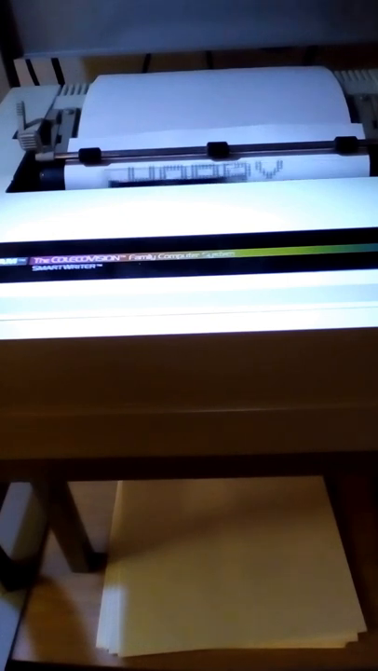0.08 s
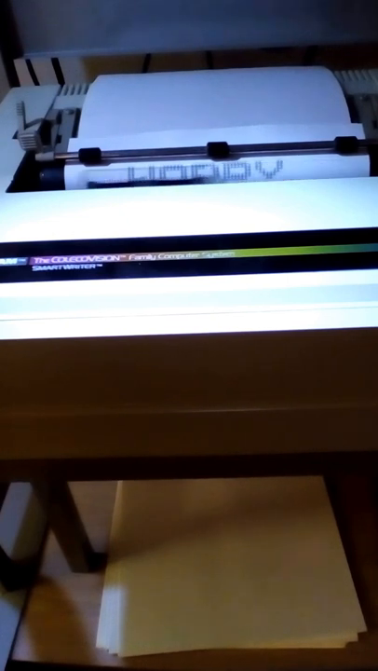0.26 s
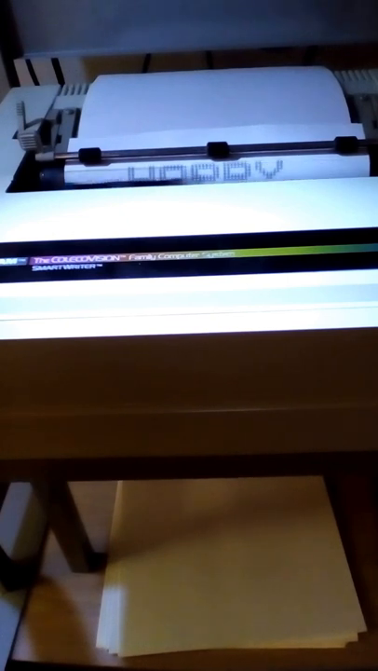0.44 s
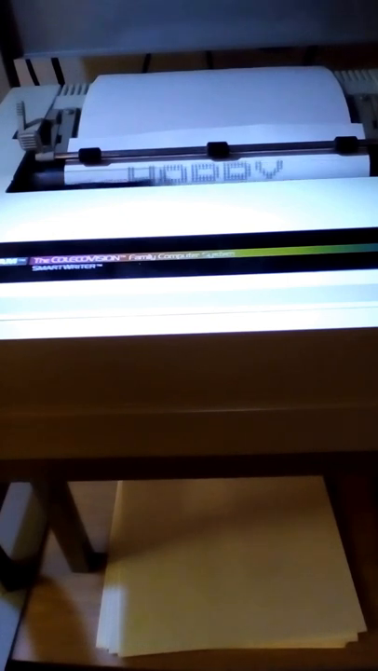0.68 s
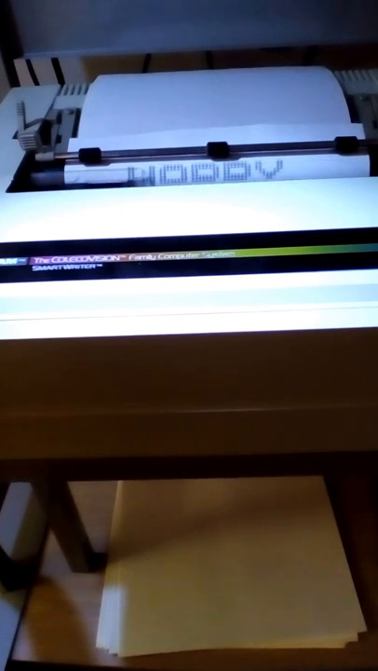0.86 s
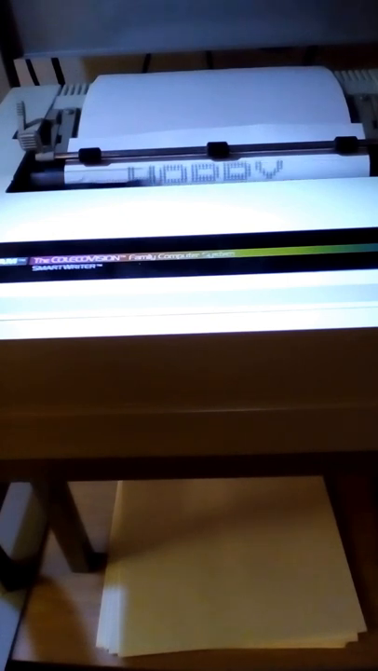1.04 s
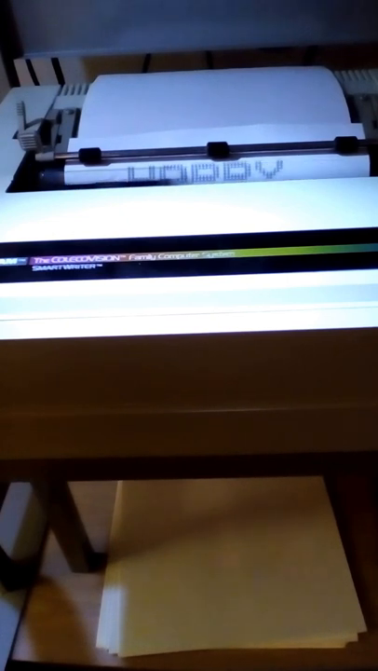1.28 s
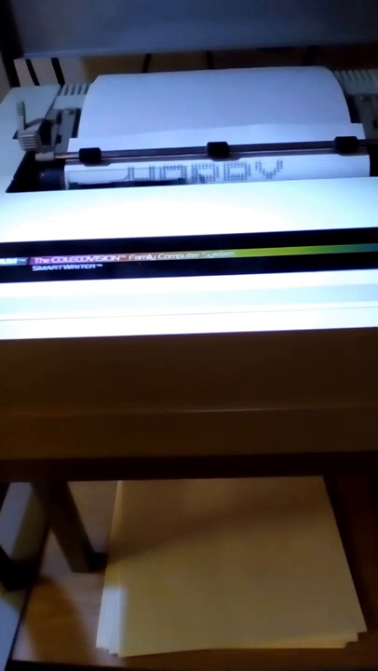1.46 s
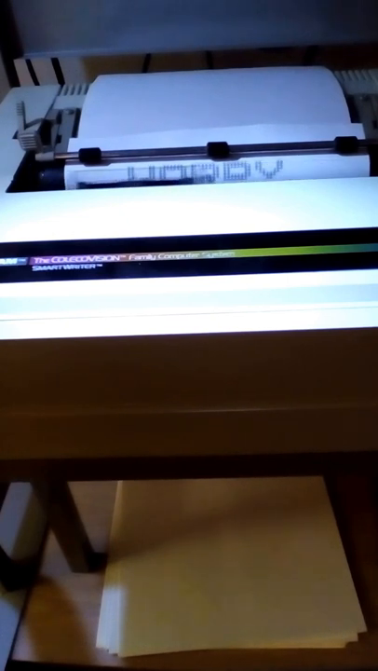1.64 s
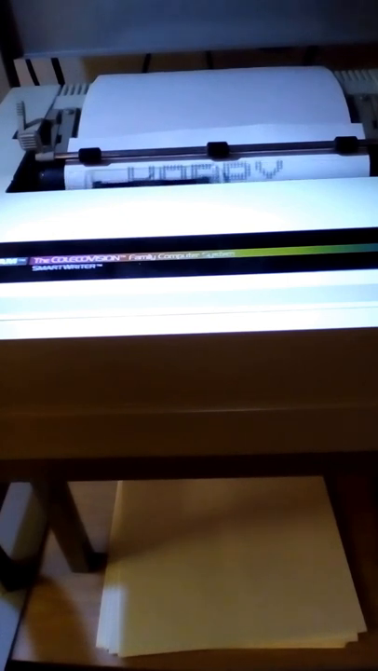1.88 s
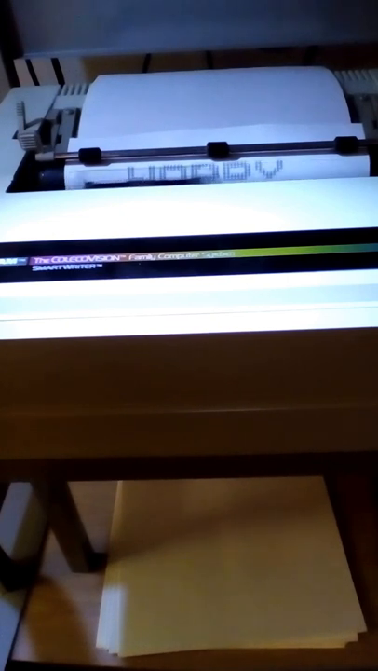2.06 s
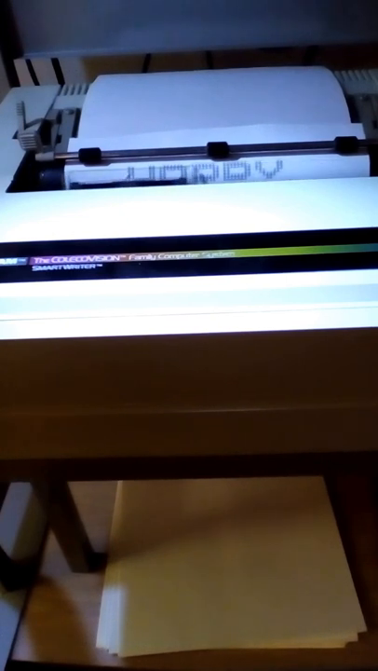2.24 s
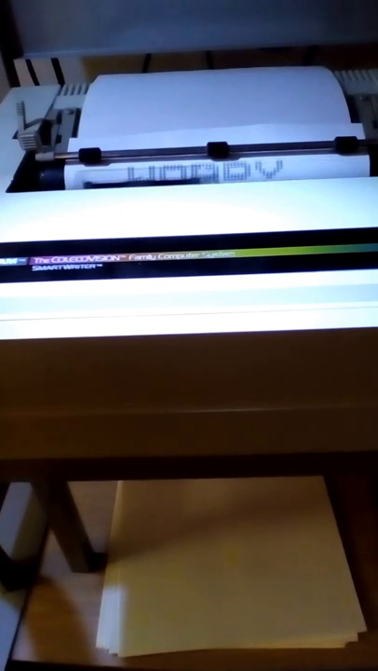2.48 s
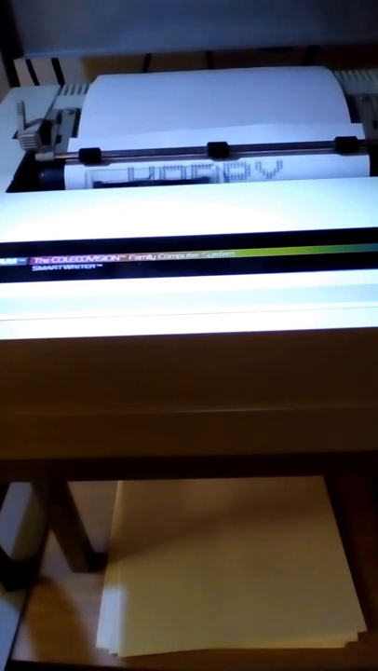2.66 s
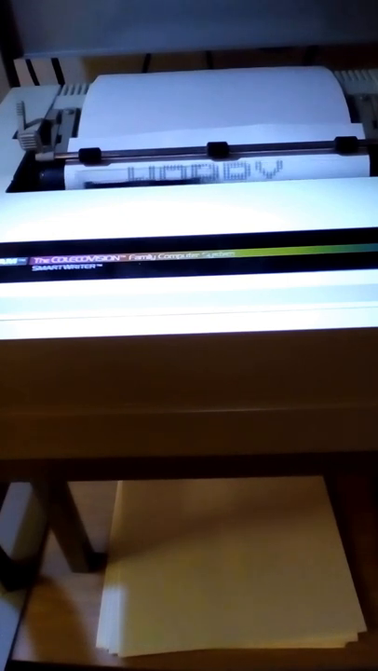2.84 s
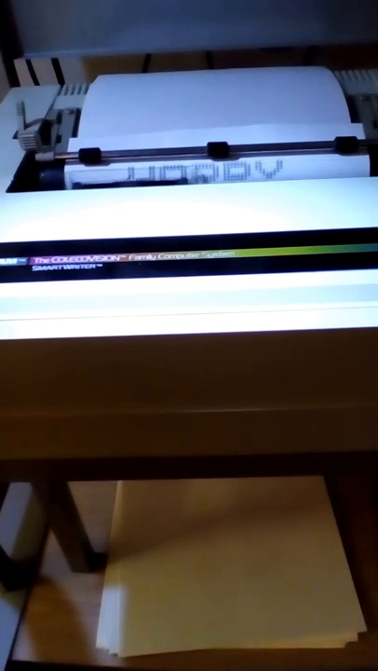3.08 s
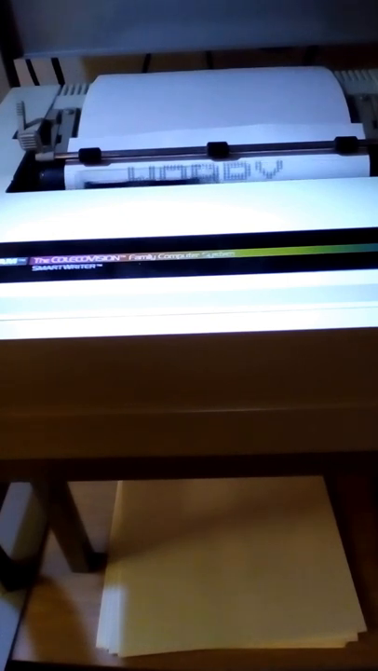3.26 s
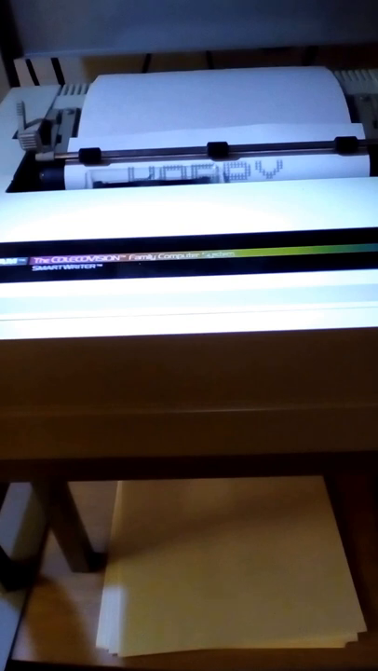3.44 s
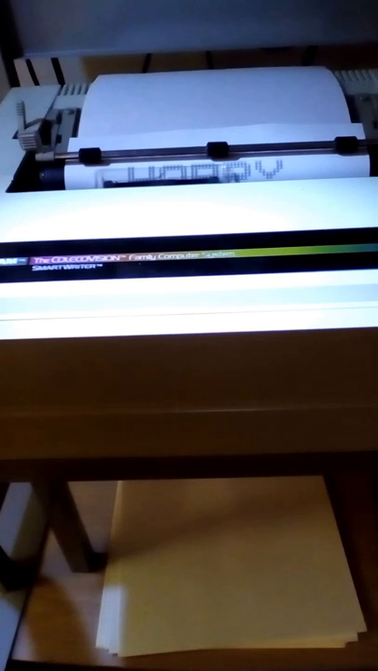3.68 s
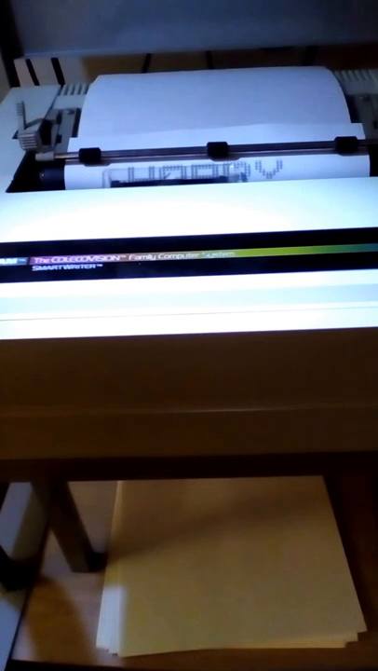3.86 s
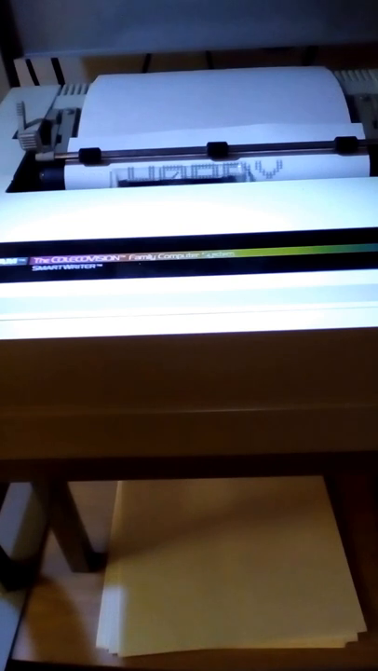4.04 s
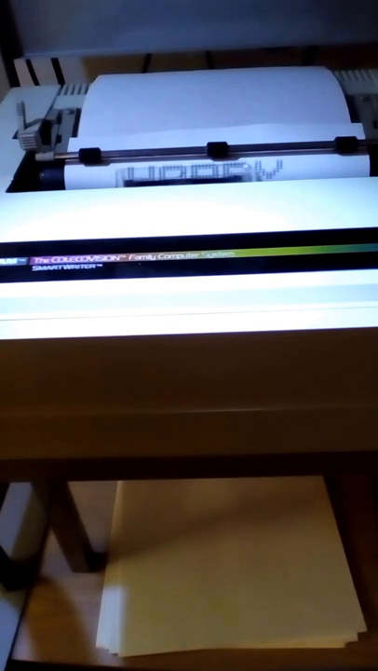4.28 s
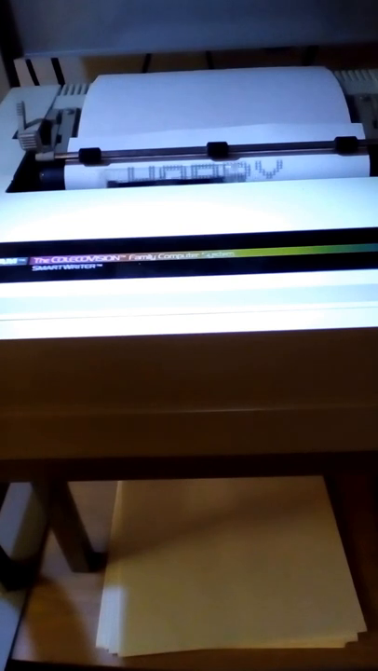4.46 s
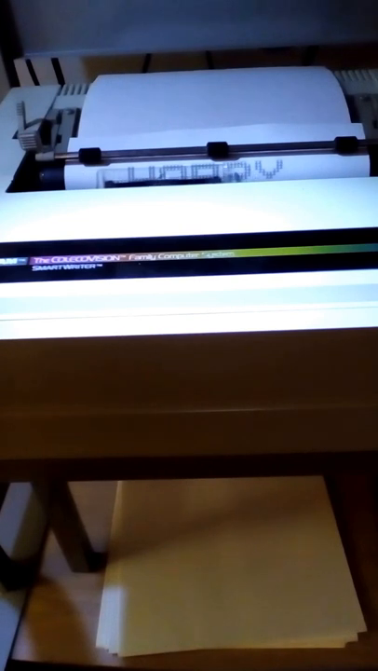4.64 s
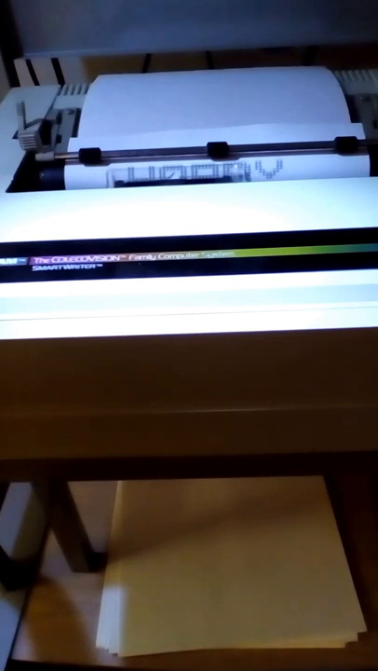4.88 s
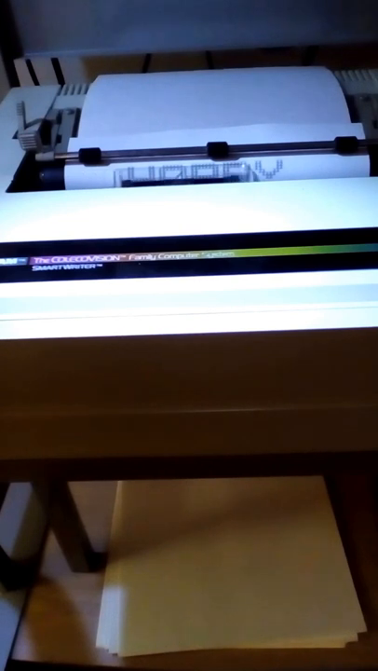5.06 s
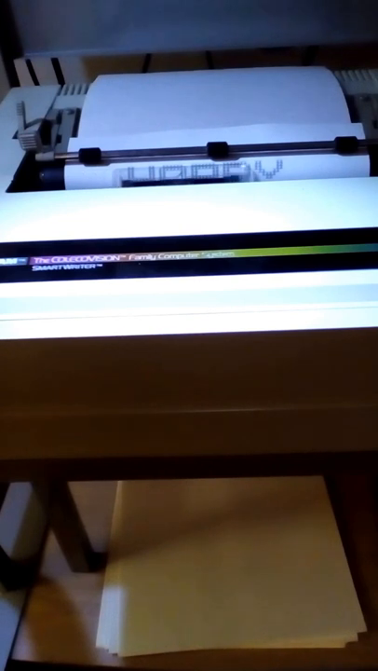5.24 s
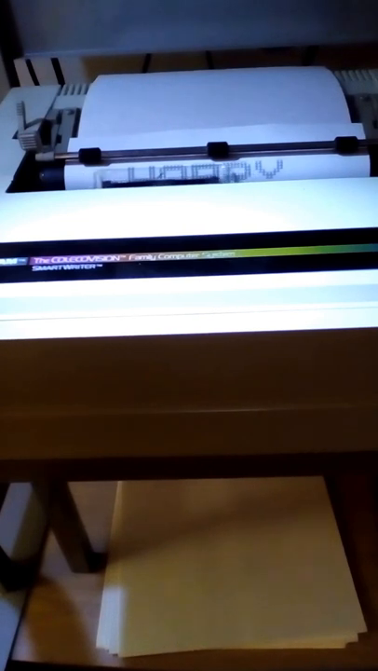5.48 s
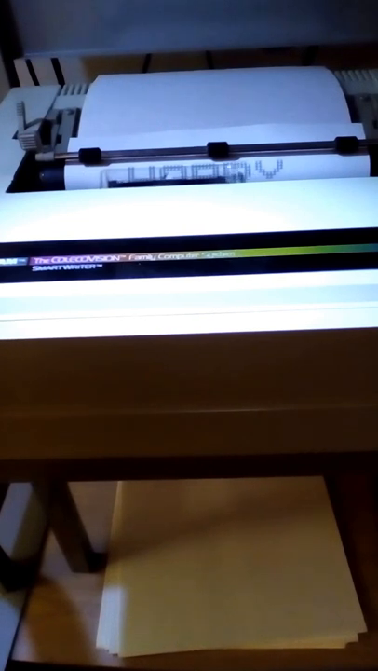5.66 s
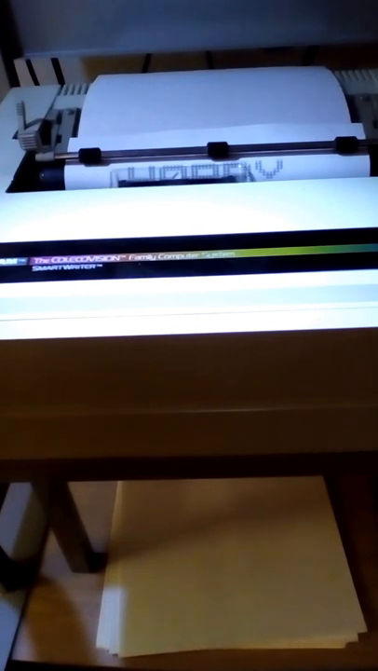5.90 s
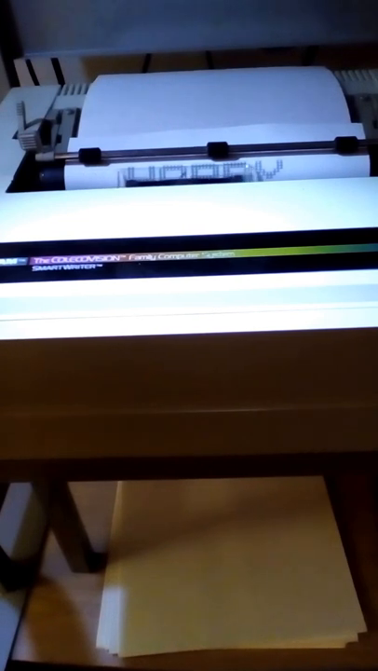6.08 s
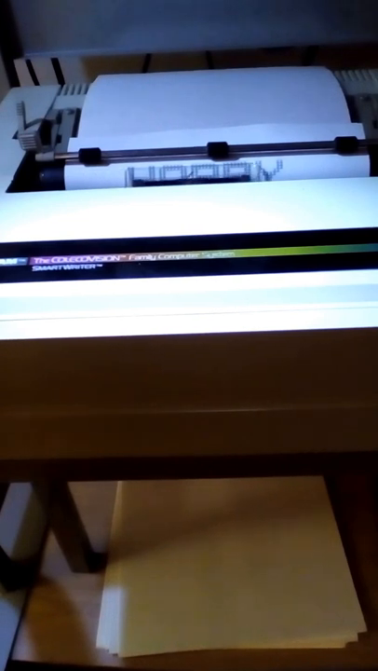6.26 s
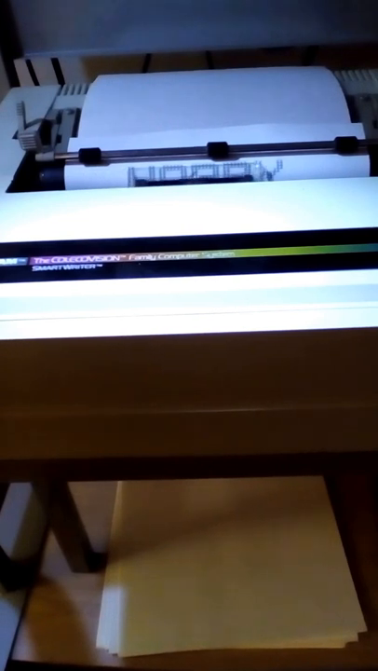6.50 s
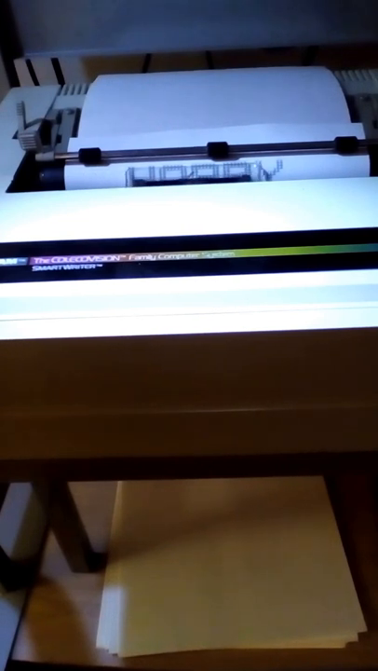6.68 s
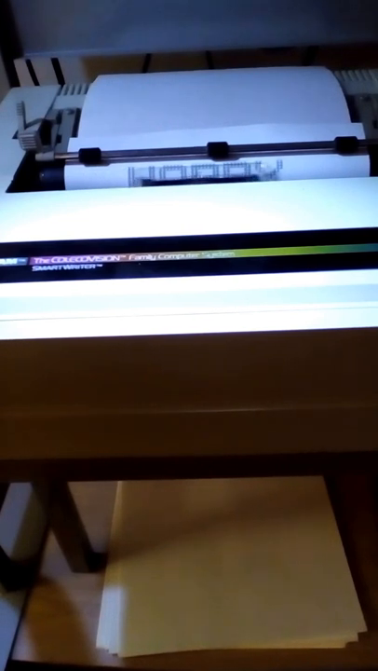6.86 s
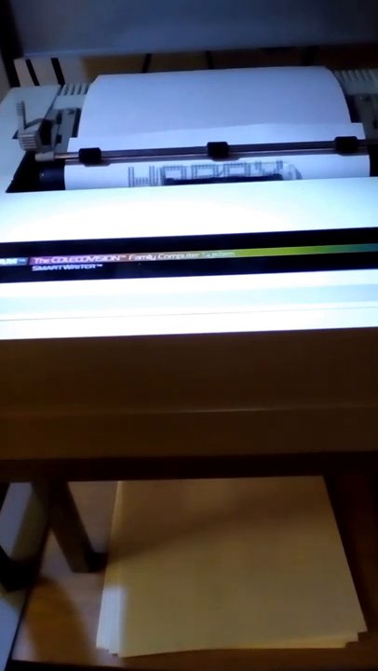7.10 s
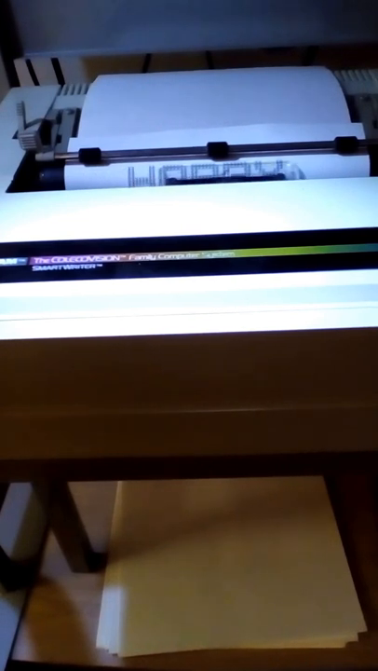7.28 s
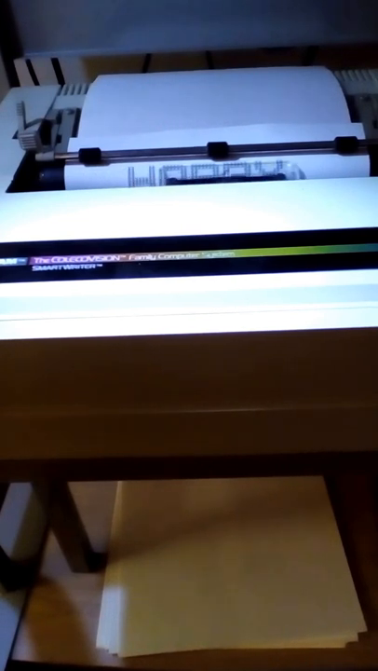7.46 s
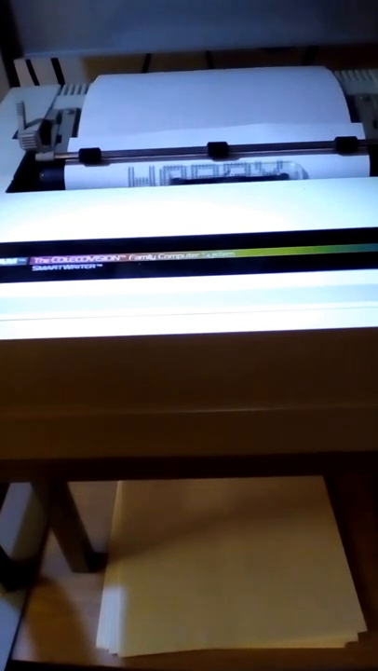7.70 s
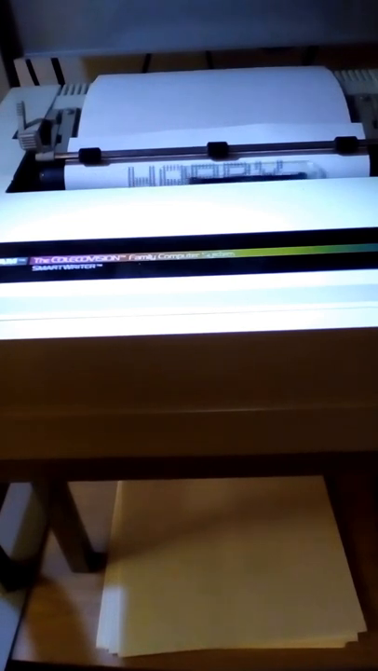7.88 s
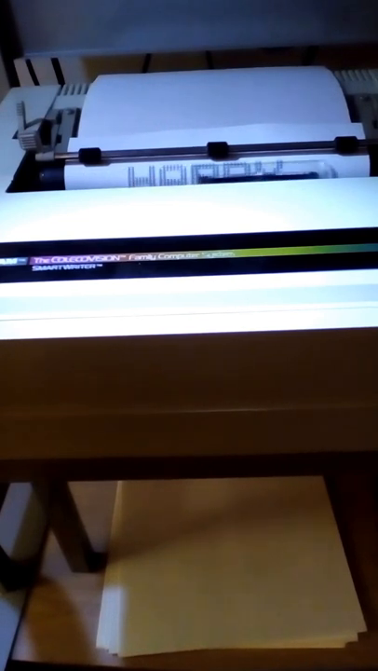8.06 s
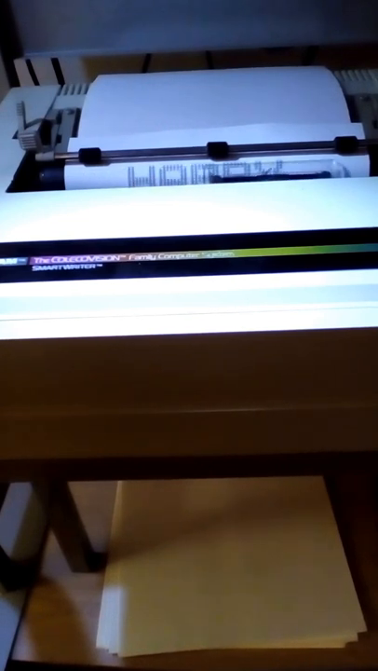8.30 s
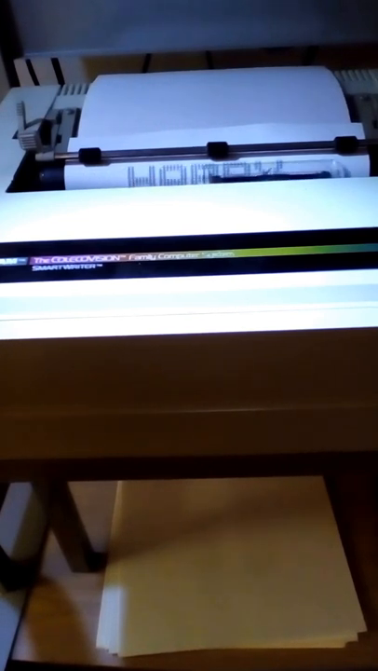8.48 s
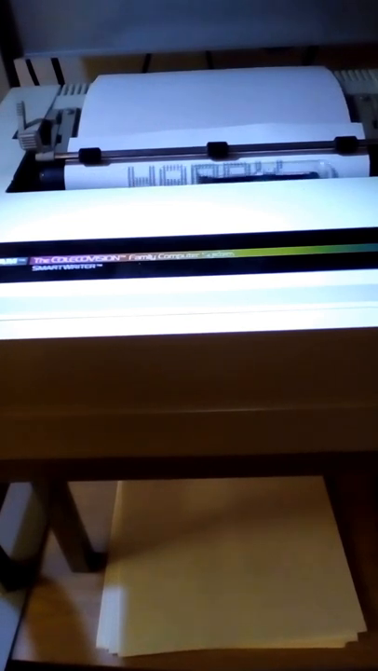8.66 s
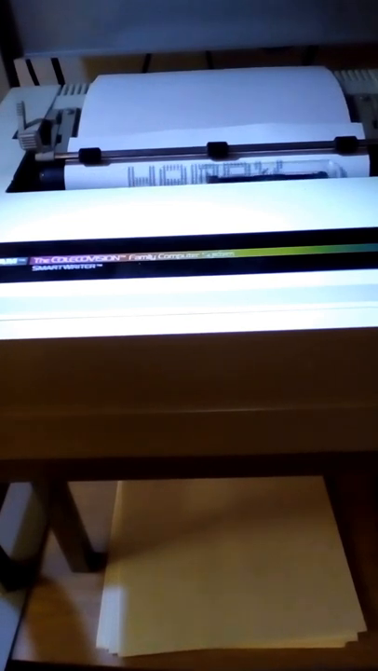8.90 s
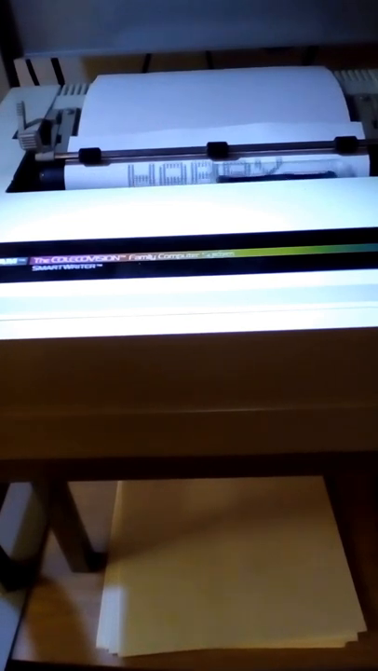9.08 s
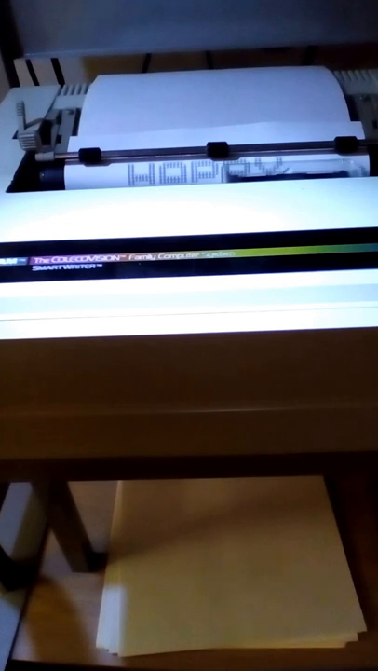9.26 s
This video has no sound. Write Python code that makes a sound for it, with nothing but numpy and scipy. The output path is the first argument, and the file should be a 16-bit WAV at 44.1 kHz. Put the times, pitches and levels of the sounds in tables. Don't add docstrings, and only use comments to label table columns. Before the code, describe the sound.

Close to a desk printer in a small room, a low fan and motor hum runs throughout. A plastic latch clacks early, the feed motor runs down and gears chatter. Then hard hammer strikes come in fast pairs, each with a woody-metallic crack, rattling parts and a short case boom. Carriage whirs fill the gaps, and a sharper clack ends it.

```python
import sys
import numpy as np
from scipy import signal
from scipy.fft import rfft, irfft
from scipy.io import wavfile
from scipy.ndimage import uniform_filter1d

SR = 44100
rng = np.random.default_rng(int(sys.argv[2]) if len(sys.argv) > 2 else 0)


def generate_wav(sig):
    pcm = np.round(np.clip(np.atleast_2d(sig).T, -1, 1) * 32767).astype(np.int16)
    wavfile.write(sys.argv[1], SR, pcm)


def amplitude_ratio(level_db):
    exponent = np.asarray(level_db, float) / 20
    return 10 ** exponent


N = 411453
T = np.arange(N) / SR


def unit(x):
    return x / np.sqrt(np.mean(x ** 2))


def curve(table, col=1):
    return np.interp(T, np.array(table)[:, 0], np.array(table)[:, col])


def colour(x, points, peaks=()):
    hz = np.fft.rfftfreq(16384, 1 / SR) + 1
    point_hz, point_db = np.array(points)[:, :2].T
    gain = amplitude_ratio(np.interp(np.log(hz), np.log(point_hz), point_db, right=-120))
    for centre, width, db in peaks:
        gain = gain * (1 + (amplitude_ratio(db) - 1) / (1 + (2 * (hz - centre) / width) ** 2))
    cepstrum = irfft(np.log(unit(gain)))[:len(hz)]
    cepstrum[1:-1] *= 2
    return signal.fftconvolve(x, irfft(np.exp(rfft(cepstrum, 16384))))[:N]


def ring(hz, gain, t60, size=16000):
    t = T[:size]
    return sum(g * np.sin(2 * np.pi * f * t) * 1000 ** (-t / d) for f, g, d in zip(hz, gain, t60))


def onset(rise, power=1):
    return 1 - np.exp(-(T[:16000] / rise) ** power)


def play(times, gains, shape):
    train = np.zeros(N)
    np.add.at(train, np.clip((np.asarray(times) * SR).astype(int), 0, N - 1), gains)
    return signal.fftconvolve(train, shape)[:N]


def swell(delay, rise, t60, db):
    t = np.maximum(T[:20000] - delay, 0)
    return amplitude_ratio(db) * (1 - np.exp(-t / rise)) * 1000 ** (-t / t60)


def walk(rate):
    hold = int(SR / rate)
    levels = rng.standard_normal(N // hold + 1)
    return 1.1 * uniform_filter1d(np.repeat(levels, hold), hold)[:N]


def grit(spread_db, rate):
    return unit(rng.standard_normal(N) * amplitude_ratio(spread_db * walk(rate)))


def knock(times, gains, modes, rise):
    hz, db, t60 = np.transpose(modes)
    return play(times, gains, ring(hz, amplitude_ratio(db), t60) * onset(rise, 2))


# (time [s], blow level [dB], carriage place [0 left - 1 right], lightly struck [0 or 1])
LETTERS = [(1.651, -5.6, 0, 0), (2.0061, -4.8, 0, 0), (2.4283, -7.8, 0, 1), (2.7818, -7.1, 0, 1),
           (3.2029, -6.2, 0, 0), (3.5585, -4.9, 0, 0), (3.808, -4.4, 0, 0), (3.979, -4.2, .15, 0),
           (4.15, -3.8, .35, 0), (4.3209, -3.2, .55, 0), (4.743, -6.6, .15, 1), (4.9122, -6.3, .25, 1),
           (5.0815, -6.4, .45, 1), (5.2508, -6, .55, 1), (5.6702, -4.4, .05, 0), (5.8415, -4.2, .15, 0),
           (6.0124, -3.6, .35, 0), (6.1834, -3.7, .45, 0), (6.4326, -2.9, .8, 0), (6.6183, -5.2, .85, 1),
           (6.8614, -2.8, .85, 0), (7.3138, -2.5, 1, 0), (7.5, -5.2, 1, 1), (7.7407, -2.6, 1, 0),
           (8.379, -2.8, 1, 0), (8.5651, -5.2, 1, 1), (9.0708, -2.7, 1, 0)]
# (hard letter [s], light letter [s])
REPEAT_S = (.0855, .0847)
# (first strike [dB], second strike [dB])
BOOM_DB = [(-28, -28), (-24.5, -27.5)]
JINGLE_DB = [(-45, -47), (-45.5, -49.5)]
RATTLE_DB = [(-22, -24.5), (-23, -26.5)]
# (boom [dB], jingle [dB], rattle [dB])
SCATTER_DB = (.7, 2, .6)


def strikes():
    s, db, place, light = np.repeat(LETTERS, 2, axis=0).T
    kind, second = light.astype(int), np.arange(len(s)) % 2
    chance = rng.standard_normal((len(s), 3)) * SCATTER_DB
    shaken = np.array([BOOM_DB, JINGLE_DB, RATTLE_DB])[:, kind, second] + chance.T
    return s + second * np.array(REPEAT_S)[kind], db, place, *shaken


def hammer():
    s, db, place, boom_db, jingle_db, rattle_db = strikes()
    first = np.arange(len(s)) % 2 == 0
    blow = platen(s, db, place) + type_snap(s, db)
    bounce = rebound(s, db, rattle_db)
    boom = case_boom(s, boom_db)
    rattle = loose_parts(s, rattle_db, first)
    return blow + bounce + boom + rattle, spokes(s, jingle_db, first)


# (frequency [Hz], t60 [s], signed share at left [ratio], at right [ratio])
PLATEN = [(820, 0.095, -0.04, -0.03), (1091, 0.021, -0.13, -0.1), (1235, 0.15, -0.05, -0.02),
          (1429, 0.059, -0.14, -0.15), (1681, 0.04, 0.44, 0.27), (1775, 0.038, 0.19, 0.27),
          (1952, 0.03, -0.29, -0.25), (2200, 0.15, -0.04, -0.09), (2423, 0.104, 0.16, 0.18),
          (2586, 0.15, 0.08, 0.07), (2789, 0.037, -0.01, -0.83), (2801, 0.022, 0.51, 1.36),
          (3167, 0.01, 0.2, -0.36), (3641, 0.15, 0.03, -0.01), (4418, 0.01, -0.2, -0.07)]


def platen(s, db, place):
    left_db = -1
    hz, t60, left, right = np.transpose(PLATEN)
    t = T[:16000]
    choke = (1 + .22 * np.exp(-(t / .0025) ** 4)) / (1 + (t / .011) ** 4)
    blow = play(s, amplitude_ratio(db + left_db) * (1 - place), ring(hz, left, t60) * choke)
    blow = signal.sosfiltfilt(signal.butter(4, 3800, fs=SR, output="sos"), blow)
    blow = blow + play(s, amplitude_ratio(db) * place, ring(hz, right, t60) * choke)
    return signal.sosfilt(signal.butter(4, 3300, fs=SR, output="sos"), blow)


def type_snap(s, db):
    snap_db = -37
    return play(s, amplitude_ratio(db + snap_db), ring([4800, 5080], [1, -.6], [.03, .03]) * onset(.00019))


# (frequency [Hz], level re blow [dB], t60 [s])
REBOUND = [(2443, -8.5, 0.037), (2780, -16.5, 0.059), (1590, -14.5, 0.01)]
# (frequency [Hz], level [dB], t60 [s])
BACKSTOP = [(1000, -11, .045), (1060, -18, .05)]


def rebound(s, db, rattle_db):
    rebound_s, backstop_s = .0062, .008
    bounce = knock(s + rebound_s, amplitude_ratio(db + rattle_db / 4), REBOUND, .001)
    return bounce + knock(s + backstop_s, amplitude_ratio(rattle_db + 22), BACKSTOP, .005)


# (frequency [Hz], level [dB], t60 [s])
BOOM = [(223.1, 1.5, 0.18), (278.3, 4.5, 0.2), (349.7, -8.5, 0.16), (159, -13.5, 0.18), (476, -16.5, 0.46)]


def case_boom(s, boom_db):
    hz, db, t60 = np.transpose(BOOM)
    signs = (-1) ** np.arange(len(hz))
    return play(s, amplitude_ratio(boom_db), ring(hz, amplitude_ratio(db) * signs, t60) * onset(.0065))


# (delay [s], rise [s], t60 [s], level [dB])
FIRST = [
    (0.0035, 0.0015, 0.079, 12),
    (.012, 0.009, 0.026, -7.5),
    (.027, 0.0047, 0.1, 4),
    (0.036, 0.09, 0.36, -38.5),
]
# (delay [s], rise [s], t60 [s], level [dB])
SECOND = [(0.0024, 0.0021, 0.046, 13.5), (0.0082, 0.0016, 0.09, 3), (0.039, 0.0018, 0.63, -21),
          (0.013, 0.0041, 0.49, -17.5)]


def loose_parts(s, rattle_db, first):
    shake = amplitude_ratio(rattle_db - 5)
    loose = play(s, shake * first, sum(swell(*stage) for stage in FIRST))
    loose = loose + play(s, shake * ~first, sum(swell(*stage) for stage in SECOND))
    return clusters(loose)


# (frequency [Hz], level [dB per Hz])
CLATTER = [(180, -29.5), (300, -4), (594, -5.5), (685, -4), (790, -12), (1030, -6), (1180, -13.5),
           (1480, -12), (1850, -6), (2170, -10.5), (2400, -4), (3470, -10), (4950, -42), (5630, -63.5),
           (9000, -64), (11700, -102), (19800, -120)]
# (frequency [Hz], width [Hz], level [dB])
HOUSING = [(263, 15, 7), (1060, 100, 9), (1388, 16, 12), (1720, 23, 5), (2630, 310, 1.5), (2780, 46, -3.5)]


def clusters(shake):
    low, high = (signal.butter(2, 1300, kind, fs=SR, output="sos") for kind in ("low", "high"))
    large = signal.sosfilt(low, shake * grit(1.8, 110))
    small = signal.sosfilt(high, shake * grit(1.6, 220))
    return colour(large + small, CLATTER, HOUSING[1:])


# (frequency [Hz], level [dB per Hz])
JINGLE = [(3290, -49.5), (5600, -24.5), (6070, -22.5), (6580, -31.5), (7130, -20), (8610, -43.5),
          (10300, -22.5), (11900, -19), (14000, 4), (15400, -6.5), (16400, -42.5)]


def spokes(s, jingle_db, first):
    level = amplitude_ratio(jingle_db - 5)
    tick = play(s, level, swell(0, .0005, .02, 1) + swell(.006, .001, .045, 10) + swell(.01, .005, .5, -21))
    tick = tick + play(s, level * first, swell(.012, .003, .05, 2) + swell(.028, .004, .07, 2))
    tick = tick + play([CLACKS[-1][0]], amplitude_ratio(-47), swell(0, .002, .062, 9.1))
    return colour(tick * grit(2.7, 600), JINGLE)


# (time [s], peak level [dB])
CLACKS = [
    (0.198, -13),
    (9.263, -17.5),
]
# (frequency [Hz], level [dB], t60 [s])
CLACK_MODES = [
    [(336, -10, 0.1), (530, -11.5, 0.44), (654, -5, 0.15), (960, -22, 0.12), (1010, -1.5, 0.49),
     (1390, -8, 0.22), (2010, -3, 0.036), (2350, -2, 0.036)],
    [(1072, 4.5, 0.12), (1440, 8.5, 0.091), (1841, -29, 0.22), (2024, -14, 0.087), (2401, 0, 0.11),
     (2767, -24, 0.21), (3100, 2.5, 0.084), (3828, -1, 0.035)],
]


def clack_sounds():
    clacks = 0
    for (s, db), modes in zip(CLACKS, CLACK_MODES):
        hz, mode_db, t60 = np.transpose(modes)
        damped = np.transpose([hz, mode_db, .9 * np.minimum(t60, .07)])
        clacks = clacks + knock([s], amplitude_ratio(db - 7), damped, .001)
    s, db = np.transpose(CLACKS)
    tail = play(s, amplitude_ratio(db), swell(0, .00043, .16, -16)) * grit(.73, 600)
    return clacks + colour(tail, [(250, -24.5), (835, -1), (1970, -8), (2980, -9), (3800, -26.5),
                                  (5000, -45), (5600, -70)])


# (start [s], length [s], chatter level [dB], drone level [dB])
MOVES = [(0.95, 0.23, -49.5, -62), (1.081, 0.19, -43, -39), (1.273, 0.28, -45, -38.5),
         (1.498, 0.081, -38, -50), (1.586, 0.044, -43, -40), (1.817, 0.15, -39.5, -44),
         (2.298, 0.11, -46, -46), (2.584, 0.17, -39, -43), (2.956, 0.04, -45, -49),
         (3.077, 0.096, -49.5, -44), (3.359, 0.162, -40, -39), (4.606, 0.089, -45, -42.5),
         (5.424, 0.024, -37, -53), (5.541, 0.082, -45.5, -45), (6.344, 0.039, -39, -41),
         (7.018, 0.237, -40, -38), (7.269, 0.019, -39.5, -48), (7.906, 0.059, -39.5, -41),
         (7.99, 0.16, -41.5, -42.5), (8.187, 0.15, -45, -44), (8.302, 0.063, -42.5, -43),
         (8.702, 0.17, -45.5, -44), (8.873, 0.19, -44.5, -43.5), (9.196, 0.089, -33.5, -36)]


def effort():
    spin_up_s, coast_t60_s, idle_drone_db = .008, .11, -60
    # delay, length s, chatter, drone dB
    steps = [(s + .023, .14, -41.5, -41.5) for s, *_ in LETTERS]
    s, length, *db = np.transpose(MOVES + steps)[:, :, None]
    coarse = T[::44]
    t = coarse - s
    run = (1 - np.exp(-np.maximum(t, 0) / spin_up_s)) * 1000 ** (-np.maximum(t - length, 0) / coast_t60_s)
    chatter, drone = (np.interp(T, coarse, np.sum((amplitude_ratio(d) * run) ** 2, axis=0)) for d in db)
    return np.sqrt(chatter), np.sqrt(drone + amplitude_ratio(idle_drone_db) ** 2)


def carriage():
    chatter, droning = effort()
    mesh = (amplitude_ratio(-7) * unit(gear_clicks()) + amplitude_ratio(.5) * unit(rail_rustle())) * chatter
    shimmer = colour(grit(2, 40), JINGLE) * chatter * amplitude_ratio(-37)
    return mesh + ratchet() + case_drone() * droning, shimmer


# (frequency [Hz], level [dB], t60 [s])
GEARS = [(2800, 1, .038), (2420, -2, .035), (1050, -8, .05), (2980, -5, .02), (3300, -9, .02),
         (2620, -6, .025)]


def gear_clicks():
    step_hz = 68.6
    steps = np.arange(0, N / SR, 1 / step_hz)
    late, strength = rng.standard_normal((len(steps), 2)).T
    teeth = play(steps + .002 * late, amplitude_ratio(3 * strength), swell(0, .001, .02, 0)) * grit(2, 600)
    hz, db, t60 = np.transpose(GEARS)
    return signal.fftconvolve(teeth, ring(hz, amplitude_ratio(db), t60) * onset(.002, 2))[:N]


# (frequency [Hz], level [dB per Hz])
CHATTER = [(88, -49), (150, -12.5), (246, -24), (278, 3), (345, -21.5), (397, -11.5), (500, -9),
           (794, -15.5), (1050, -16.5), (1540, -20.5), (1670, -19), (2770, -20), (6000, -66.5),
           (7800, -102), (13200, -120)]


def rail_rustle():
    return colour(grit(2, 300) * amplitude_ratio(2.5 * walk(30)), CHATTER, HOUSING[1:])


# (time [s], peak level [dB])
RATCHET = [(1.007, -67.5), (1.0376, -56), (1.092, -51), (1.1144, -59), (1.1663, -56), (1.2042, -53),
           (1.24, -65.5), (1.3189, -62), (1.5245, -49), (1.6078, -52.5), (7.0678, -53), (7.1152, -53),
           (7.1646, -53), (7.235, -57), (7.271, -64), (7.9354, -55), (7.9544, -63), (8.031, -51),
           (8.054, -51), (8.0885, -57), (8.1379, -55), (8.1963, -54), (8.2212, -55), (8.254, -58),
           (8.293, -48), (8.8867, -58), (8.962, -50.5), (8.993, -56), (9.027, -57), (9.205, -37.5)]
# (frequency [Hz], level [dB per Hz])
SCRAPE = [(900, -35), (2000, 4), (2850, 9), (3500, 8), (4200, -16.5), (5100, -24), (5600, -39.5)]


def ratchet():
    s, db = np.transpose(RATCHET)
    bursts = play(s, amplitude_ratio(db), swell(0, .002, .09, 3)) * grit(2, 300)
    return amplitude_ratio(5) * colour(bursts, SCRAPE)


# (frequency [Hz], width [Hz], level [dB])
CASE = [(220.7, 4.7, 18), (279, 11, 20.5), (335.6, 16, 15.5)]


def case_drone():
    return unit(colour(grit(2.3, 30), [(150, -34), (200, -2.5), (360, 2), (450, -18)], CASE))


def stack(hz, orders, wobble):
    turn = 2 * np.pi * np.cumsum(hz * (1 + wobble * walk(2.8))) / SR
    return sum(np.sqrt(2) * amplitude_ratio(db + .47 * walk(3.5)) * np.sin(k * turn + k * k) for k, db in orders)


# (multiple of shaft rate [ratio], level [dB])
FAN = [(1, -49), (2, -55.5), (3, -76), (4, -54), (5, -62), (8, -69.5)]
# (multiple of shaft rate [ratio], level [dB])
FEEDER = [(1, -64), (2, -58), (3, -74), (4, -43), (5, -67.5)]
# (time [s], level [dB])
FEEDER_ON = [
    (0, -7.5),
    (.9, -1),
    (1.1, -7),
    (1.5, -34.5),
    (9.33, -30),
]
# (frequency [Hz], level [dB per Hz])
AIR = [(20, -9.5), (40, -25.5), (75, -13), (180, -11), (275, -6.5), (320, -6.5), (520, -19), (730, -21),
       (1080, -18), (2090, -37), (2880, -32.5), (3400, -36), (4600, -68.5), (6000, -100)]


def hum():
    fan_hz, feed_hz, pump_hz = 57.25, 68.2, 86.8
    motors = stack(fan_hz, FAN, .0007) + stack(feed_hz, FEEDER, .0011) * amplitude_ratio(curve(FEEDER_ON))
    far_tone = stack(pump_hz, [(1, -54.5)], .0015)
    air = colour(grit(1, 12), AIR, [(2403, 240, 14.1), (1020, 17, 5.8), (565.6, 12, 13)]) * amplitude_ratio(-48.5)
    return motors + far_tone + air


def scene():
    blows, jingle = hammer()
    travel, shimmer = carriage()
    knocks = blows + clack_sounds()
    room = rng.standard_normal(20000) * swell(.003, .0036, .44, -54)
    near = knocks + signal.fftconvolve(knocks, room)[:N] + travel + hum()
    shut = signal.sosfiltfilt(signal.cheby2(8, 20, 5600, fs=SR, output="sos"), near)
    return (shut + jingle + shimmer)[None]


def band_limit(x):
    return signal.sosfilt(signal.butter(12, 16510, fs=SR, output="sos"), x)


# (frequency [Hz], level [dB per Hz])
PORT = [(3200, -64.5), (5300, -28.5), (8000, -15), (10200, -28.5), (11100, -9.5), (12000, -6), (13800, 8),
        (15100, -5), (15900, -17.5), (16400, -25)]


def record(dry):
    clip = .714
    hiss = colour(rng.standard_normal(N), PORT) * amplitude_ratio(-74.5)
    return band_limit(np.clip(dry + hiss, -clip, clip))


dry = scene()
out = record(dry)
generate_wav(out)
```